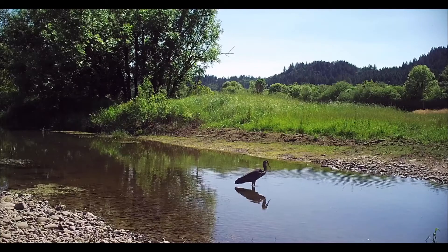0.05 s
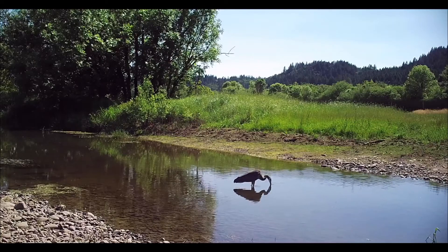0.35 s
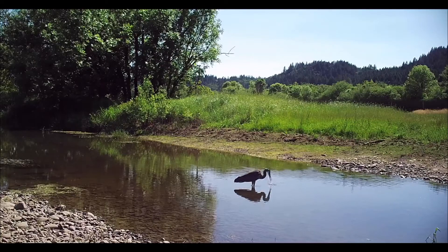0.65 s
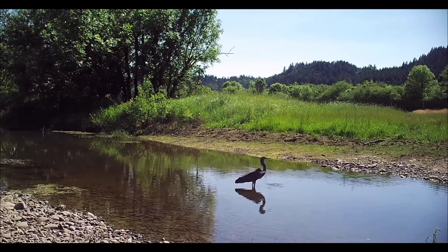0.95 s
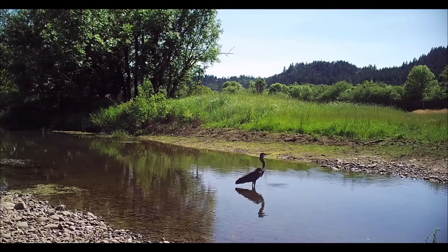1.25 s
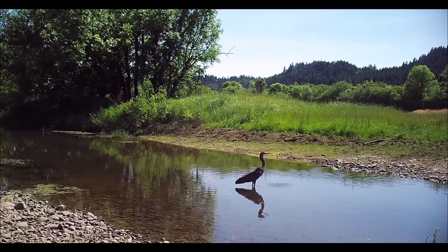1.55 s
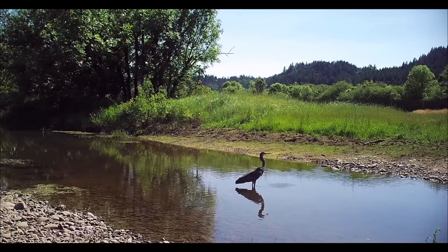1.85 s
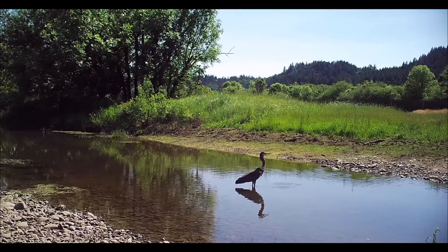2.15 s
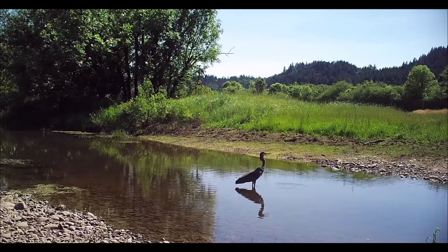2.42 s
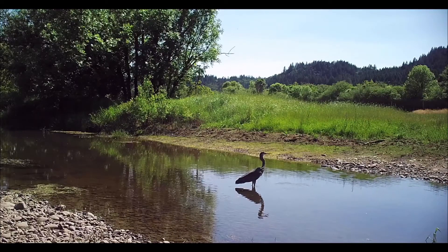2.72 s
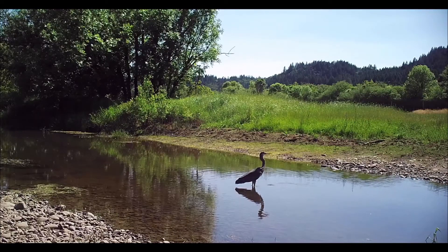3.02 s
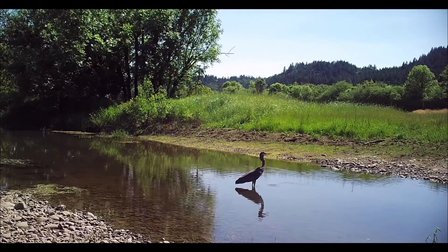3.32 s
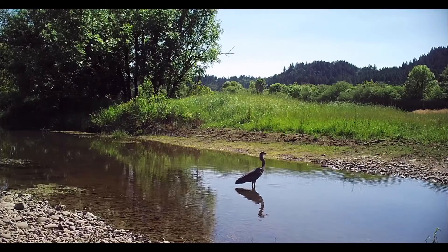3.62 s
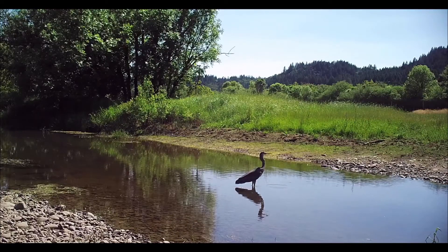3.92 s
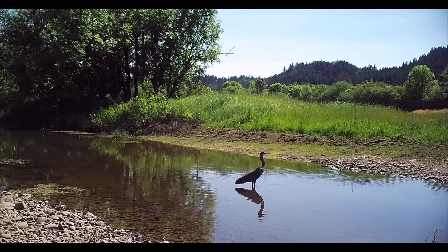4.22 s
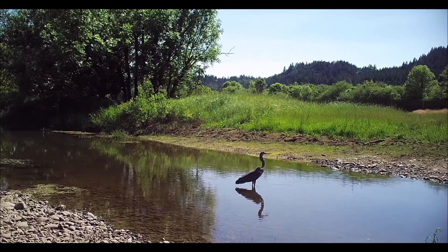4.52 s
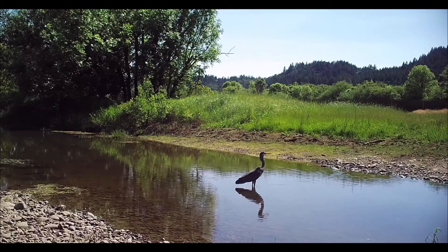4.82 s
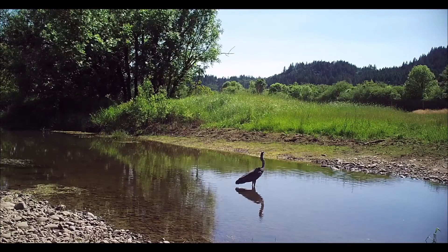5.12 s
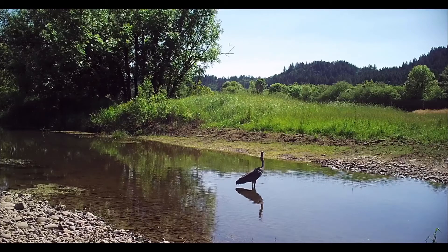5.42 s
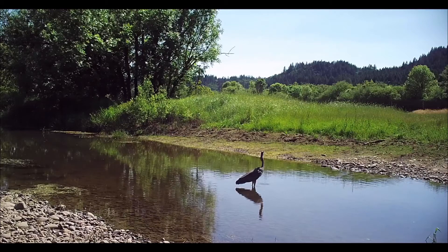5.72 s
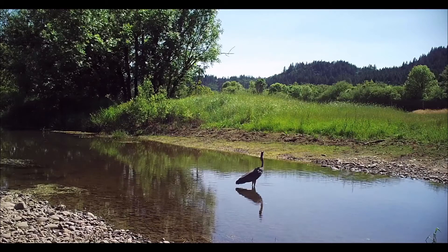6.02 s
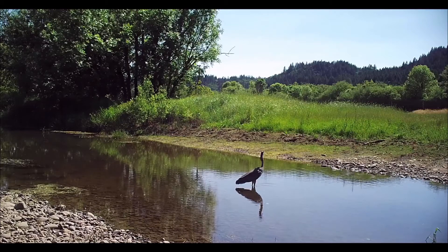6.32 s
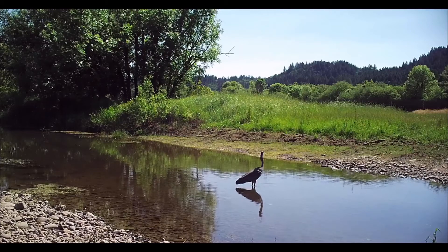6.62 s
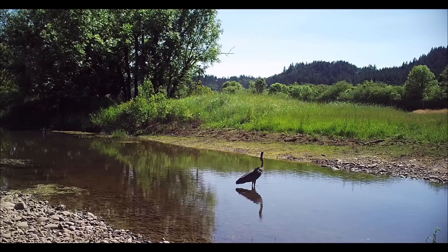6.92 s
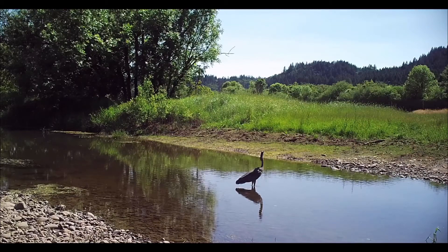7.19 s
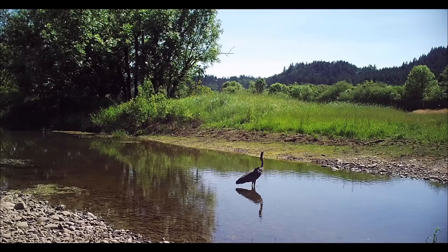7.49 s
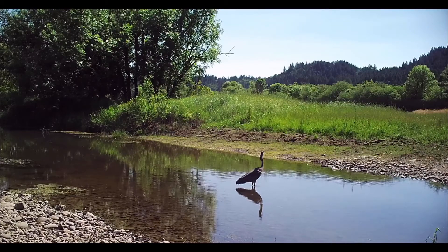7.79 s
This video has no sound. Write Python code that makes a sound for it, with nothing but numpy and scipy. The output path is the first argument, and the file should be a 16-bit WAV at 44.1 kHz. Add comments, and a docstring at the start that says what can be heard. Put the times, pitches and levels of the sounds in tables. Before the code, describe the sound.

A soft wash of water and leaves runs for all eight seconds beside a quiet creek, with a low distant rumble and faint microphone hiss. A far engine drones within the rumble, swelling slightly just before one second, then sinking back. From about 0.5 to 0.7 seconds, a cluster of sharp, ringing ticks sounds on the right, like a tiny splash. Small birds whistle and pip faintly in the distance through the first four and a half seconds. At about 4.6 seconds a blackbird on the right begins with short notes and a quick stutter. Its clear whistle at 4.8 seconds is the loudest sound and ends in a harsh snap. A buzzing, two-voiced trill follows until 5.5 seconds, closing with a short lower note. Banks and trees add a light echo. From 6.5 seconds, a few faint, thin calls return, with one stray click near 7.6 seconds.

```python
"""A blackbird by a quiet creek

Water and leaves make a soft wash over a low, distant rumble with an engine's drone in it.
Small birds chirp far off. A brief cluster of sharp, ringing ticks sounds on the right, with stray clicks.
A blackbird on the right sings once: short notes, a loud whistle, then a buzzing, two-voiced trill.
Banks and trees scatter the calls, and the microphones add a faint hiss."""
import sys
import numpy as np
from scipy import signal
from scipy.fft import rfft, irfft, next_fast_len
from scipy.io import wavfile

SR = 44100
rng = np.random.default_rng(int(sys.argv[2]) if len(sys.argv) > 2 else 0)


def waveform_to_disk(signal):
    """Save audio, clipped to [-1, 1], as 16-bit WAV at the path in sys.argv[1]."""
    frames = np.transpose(np.atleast_2d(signal))
    scaled = np.clip(frames, -1, 1) * 32767
    samples = np.round(scaled).astype(np.int16)
    wavfile.write(sys.argv[1], SR, samples)


N = 350595
TIME = np.arange(N) / SR


def undb(db):
    """Turn decibels (dB) into a number to multiply a sound by."""
    return 10 ** (np.asarray(db) / 20)


def unit(x):
    """Scale a sound so that its average power is 1."""
    return x / np.sqrt(np.mean(x ** 2))


def curves(table):
    """Join rows that begin with a time into one curve for each other column."""
    times, *columns = np.transpose(table)
    return [np.interp(TIME, times, column) for column in columns]


def colour(x, points):
    """Turn a sound's lows and highs up or down. Each point: frequency in Hz, gain in dB."""
    hz, db = np.transpose(points)
    size = next_fast_len(x.shape[-1])
    freqs = np.maximum(np.fft.rfftfreq(size, 1 / SR), 1)
    gain = undb(np.interp(np.log(freqs), np.log(hz), db))
    return irfft(rfft(x, size) * gain, size)[..., :x.shape[-1]]


def wobble(rate, size=N):
    """A random curve, about 1 in size, that changes course `rate` times a second."""
    at = np.arange(size) * rate / SR
    corners = rng.standard_normal(int(at[-1]) + 2)
    return np.interp(at, np.arange(len(corners)), corners) * np.sqrt(3 / 2)


def phase_of(hz):
    """Add up a changing pitch into the angle of its wave."""
    return 2 * np.pi * np.cumsum(hz) / SR


def gate(start, end, edge_s):
    """Fade in around `start` and out around `end`."""
    return np.clip(np.minimum(TIME - start, end - TIME) / edge_s + .5, 0, 1)


def sprinkle(span_s, count):
    """Spread events loosely over a span. Each row: start in seconds, two random numbers from 0 to 1."""
    late, a, b = rng.random((count, 3)).T
    first, last = span_s
    return zip(first + (last - first) * (np.arange(count) + late) / count, a, b)


def add(track, start_s, sound):
    """Mix a sound into a track at the given time."""
    start = max(int(start_s * SR), 0)
    part = sound[:max(N - start, 0)]
    track[start:start + len(part)] += part


def place(x, left_db, lag_ms=0):
    """Make stereo: a sound on the right reaches the left microphone weaker, and later if given a lag."""
    left, right = np.broadcast_to(x, (2, N))
    left = np.roll(left, round(lag_ms * SR / 1000))
    return np.array([left * undb(left_db), right])


def stereo_noise(likeness):
    """Left and right noise: unrelated at likeness 0, the same at 1."""
    shared, side = rng.standard_normal((2, N))
    return np.sqrt(1 + likeness) * shared + np.sqrt(1 - likeness) * np.array([side, -side])


def scatter(x, fade_s, build_s):
    """Give each microphone many small echoes, which fall 60 dB in `fade_s`."""
    t = np.arange(SR) / SR
    build_up = 1 - np.exp(-(t / build_s) ** 2)
    echoes = rng.standard_normal((2, SR)) * np.exp(-np.log(1000) * t / fade_s) * build_up
    echoes /= np.sqrt(np.sum(echoes ** 2, axis=1, keepdims=True))
    return signal.fftconvolve(x[None], echoes, axes=1)[:, :N]


def rumble():
    """Low noise from far away, with the wavering drone of an engine in it."""
    # The rumble's tone. Each row: frequency in Hz, relative level in dB.
    tone = [(15, -16), (25, -11), (40, -9.5), (65, -5), (100, -11), (135, -14), (165, -26), (210, -35),
            (340, -54), (570, -100)]
    # Its slow swells. Each row: time in seconds, level in dB.
    swells = [(0, -38.5), (.9, -36), (1.2, -38), (3.1, -39), (3.25, -35), (3.6, -38), (5.2, -37),
              (7.9, -39)]
    # The engine. Each row: time in seconds, pitch in Hz, level in dB.
    engine = [(0, 84, -40.5), (.45, 84, -39.5), (.85, 92, -33.5), (1.25, 93, -47.5), (7.95, 93, -44)]
    noise_db, = curves(swells)
    drone_hz, drone_db = curves(engine)
    noise = unit(colour(stereo_noise(likeness=.93), tone)) * undb(noise_db)
    drone = np.sqrt(2) * np.sin(phase_of(drone_hz + 4 * wobble(16)))
    drone *= undb(drone_db + 1.7 * wobble(7))
    return place(noise + drone, left_db=-11)


def creek(level_db=-55.5, split_hz=700):
    """A soft wash of water and leaves whose lows and highs stir separately."""
    # The wash's tone. Each row: frequency in Hz, relative level in dB.
    tone = [(120, 2), (230, -1), (400, -0.5), (620, -3), (1000, -4), (1500, -10), (2400, -16), (4500, -18),
            (6900, -16.5), (9000, -23), (15000, -26.5)]
    # How it leans to one side. Each row: frequency in Hz, left level minus right level in dB.
    lean = [(200, 0.5), (400, -2.5), (700, -3), (1200, -6), (2400, 0), (7000, -3)]
    wash = unit(colour(stereo_noise(likeness=.3), tone))
    lows = signal.sosfilt(signal.butter(1, split_hz, fs=SR, output="sos"), wash)
    highs = wash - lows
    left, right = lows * undb(.45 * wobble(8.3)) + highs * undb(.64 * wobble(6))
    return np.array([colour(left, lean), right]) * undb(level_db)


def note(length_s, hz, glide_hz, rasp, octave_db=-30, arch=.0068):
    """A bird's nearly pure note slides in a slight arch; rasp shakes its pitch and level quickly."""
    size = int(length_s * SR)
    progress = np.linspace(0, 1, size)
    pitch = hz * (1 - arch * (2 * progress - 1) ** 2) + glide_hz * (progress - .5)
    phase = phase_of(pitch * (1 + .12 * rasp * wobble(1500, size)))
    swell = np.sin(np.pi * progress) ** .75
    flutter = undb(2.8 * rasp * wobble(253, size))
    return unit(swell * flutter * (np.sin(phase) + undb(octave_db) * np.sin(2 * phase)))


def phrase(rows):
    """Play one bird note for each row."""
    track = np.zeros(N)
    for start, length, hz, glide_hz, db, rasp in rows:
        add(track, start, undb(db) * note(length, hz, glide_hz, rasp))
    return track


def far_birds(slur_rasp=.18, pip_s=.028, pip_glide_hz=40, pip_rasp=.17):
    """Small birds whistle, pip and buzz far off, softened by the trees."""
    # A songbird's sliding whistles. Each row: start and length in seconds, pitch and glide in Hz,
    # level in dB.
    slurs = [(.31, .08, 2500, -200, -70), (1.15, .06, 2150, 700, -72), (1.22, .062, 2880, -100, -70),
             (1.32, .08, 2150, -100, -72), (1.652, .055, 2950, -1200, -70), (1.96, .075, 2340, 700, -69),
             (2.375, 0.044, 2780, -1200, -65.5), (2.46, .053, 2720, 500, -70),
             (2.515, .058, 2750, -300, -67.5), (2.803, .037, 2030, -500, -68), (2.92, .075, 2000, 200, -69),
             (3.212, 0.033, 2570, -500, -65.5), (3.272, 0.027, 3060, 0, -64), (3.499, .13, 2630, 390, -68),
             (3.975, 0.056, 3000, -1050, -66.5), (4.06, .038, 2760, -330, -65),
             (7.885, .03, 3300, -1700, -68)]
    # Low pips, all alike. Each row: start in seconds, pitch in Hz, level in dB.
    pips = [(2.66, 2040, -67), (2.755, 2080, -61.5), (2.848, 2060, -63), (3.005, 2110, -63),
            (3.15, 2100, -65), (3.51, 2010, -64.5), (3.635, 2040, -62.5), (3.76, 1975, -64),
            (4.56, 2060, -61)]
    # Other birds' thin or buzzy calls. Each row: as for the slurs, then rasp from 0 to 1.
    thin_calls = [(0, 0.11, 3120, -70, -66, .64), (.27, .11, 6400, 30, -62.5, 0),
                  (1.06, .59, 4420, -600, -76, .2), (3.4, .025, 6230, 50, -64, .13),
                  (3.76, .032, 5900, 100, -66.5, .05), (6.55, .1, 5050, -180, -71, 1),
                  (6.78, .17, 3420, 60, -66, .53), (7.315, .075, 3490, -260, -59, .15),
                  (7.61, .065, 4220, -200, -67.5, .45), (7.845, 0.055, 4230, -60, -64, 0.27)]
    notes = [(*row, slur_rasp) for row in slurs]
    notes += [(start, pip_s, hz, pip_glide_hz, db, pip_rasp) for start, hz, db in pips]
    # The songbird's softer notes fall at random among its whistles.
    notes += [(start, .06, 1950 + 400 * high, 400 * (2 * rise - 1), -71, slur_rasp)
              for start, high, rise in sprinkle(span_s=(1.1, 4.4), count=5)]
    calls = phrase(notes) + phrase(thin_calls)
    echoes = scatter(calls, fade_s=.32, build_s=.0045)
    return place(calls, left_db=-9) + undb(-4.5) * place(echoes, left_db=-13)


def ticks(ring_s=.00056, fizz_s=.0058):
    """Sharp ticks on the right: each is a click with a tiny ring and a short fizz of noise."""
    # A brief cluster and a few strays. Each row: start in seconds, relative level in dB,
    # ring pitch in Hz, extra ring level in dB.
    main_ticks = [(.096, -52, 5500, -1), (.5012, -47, 4600, 5), (.505, -47, 7100, 0), (.508, -52, 3500, 9),
                  (.5697, -44, 3200, 2), (.573, -39, 7700, 0), (.59, -51, 2380, 8), (.5955, -49, 3500, 4),
                  (.5985, -46.5, 3530, 7), (.6038, -40, 6900, 1), (.6215, -31.5, 7100, 5),
                  (.622, -40, 5240, 3), (.6268, -41, 7260, 6), (.6348, -31, 7000, 3.5),
                  (.6445, -43, 6800, -10), (.6965, -42, 7000, 1), (7.635, -50.5, 7200, 4)]
    # The tone of a click. Each row: frequency in Hz, gain in dB.
    click_tone = [(800, -31), (2000, -12), (3400, -11.5), (4000, -15), (4700, -9), (6000, -9), (6950, 0),
                  (7800, -7), (8400, -5), (9300, -17), (15000, -33)]
    # Fainter ticks come at random around the cluster.
    faint_ticks = [(start, -57 + 4 * strength, np.interp(high, [0, 1], [2600, 7500]), 5)
                   for start, strength, high in sprinkle(span_s=(.47, .7), count=7)]
    clicks, rings = np.zeros((2, N))
    t = np.arange(SR // 20) / SR
    spike = undb(22.5) * (t == 0)
    for start, db, hz, ring_db in list(main_ticks) + faint_ticks:
        fizz = undb(-1) * np.exp(-t / fizz_s) * rng.standard_normal(len(t))
        add(clicks, start, undb(db) * (spike + fizz))
        # The ring builds over a few cycles as it dies away.
        swell = (1 - np.exp(-t * hz / 2)) * np.exp(-t / ring_s)
        add(rings, start, undb(db + ring_db + 11.5) * swell * np.sin(2 * np.pi * hz * t))
    ticking = colour(clicks, click_tone) + rings
    echoes = scatter(ticking, fade_s=.2, build_s=.0032)
    return place(ticking, left_db=-10.5) + undb(-13) * place(echoes, left_db=-8)


def blackbird(echo_s=.08, echo_db=-25):
    """One song from a perch on the right; the far bank throws it back."""
    # Short notes, squeaks and faint lingering tones. Each row: start and length in seconds,
    # pitch and glide in Hz, level in dB, rasp from 0 to 1.
    short_notes = [(4.555, 0.055, 1550, 0, -62.5, .04), (4.63, 0.045, 1730, 100, -56, 0.4),
                   (4.65, 0.042, 7100, 290, -59, 0.15), (4.6645, 0.0065, 7120, 130, -46.5, .05),
                   (4.858, 0.03, 5870, 80, -49, .14), (4.868, 0.023, 6930, 100, -50, .12),
                   (4.93, 0.1, 5640, 20, -65, 0.02), (5.485, .08, 7300, 100, -62, .06),
                   (5.545, 0.072, 1863, -30, -53, 0.03), (5.6, .11, 1858, 10, -63, 0.07)]
    song = phrase(short_notes) + stutter() + whistle() + trill()
    bank_echo = undb(echo_db) * np.roll(song, int(echo_s * SR))
    echoes = scatter(song, fade_s=.32, build_s=.024)
    return place(song + bank_echo, left_db=-12.5, lag_ms=.15) + undb(-9.5) * place(echoes, left_db=-12.5)


def stutter(start_s=4.668, gap_s=.0195, hz=2880, db=-49):
    """Five quick falling pulses lead into the whistle, each trailing off in a short rasp."""
    starts = start_s + gap_s * np.arange(5)
    pulses = phrase([(start, .0048, hz, -380, db, .35) for start in starts])
    rasps = phrase([(start, .02, hz, 300, db - 10, .54) for start in starts])
    return pulses + rasps


def whistle(snap_at_s=4.902, snap_fade_s=.0038, harsh_width_s=.025):
    """A loud, clean tone jumps an octave (to twice its pitch), turns harsh and snaps off."""
    # The whistle's path. Each row: time in seconds, pitch in Hz, level in dB, octave's level in dB.
    path = [(4.748, 2886, -54, -75), (4.777, 2775, -38, -64), (4.795, 2762, -30, -60),
            (4.814, 2732, -42.5, -62), (4.849, 2736, -50, -55), (4.859, 2750, -58, -35.5),
            (4.878, 2778, -57, -45.5), (4.9, 2705, -62, -62)]
    # The tone of the harsh ending. Each row: frequency in Hz, relative level in dB.
    snap_tone = [(3500, -38), (4900, -13), (5600, 4), (6900, -3), (8200, -7), (9500, -30)]
    hz, db, octave_db = curves(path)
    phase = phase_of(hz * (1 + .002 * wobble(600)))
    tone = np.sqrt(2) * (undb(db) * np.sin(phase) + undb(octave_db) * np.sin(2 * phase))
    tone *= gate(path[0][0], path[-1][0], edge_s=.004)
    since = TIME - snap_at_s
    harsh = undb(-50) * np.exp(-np.abs(since) / harsh_width_s)
    snap = undb(-36) * np.exp(-np.abs(since) / snap_fade_s) * (since > 0)
    return tone + (harsh + snap) * unit(colour(rng.standard_normal(N), snap_tone))


def trill_curves(edge_s=.022, arch_hz_per_s=135, sag_db_per_s=8.5):
    """Each syllable of the trill arches up in pitch, sags in level, then slides into the next."""
    # Each row: start and length in seconds, upper and lower pitch in Hz, level in dB,
    # lower voice's level against the upper in dB, buzz strength in dB.
    syllables = [(4.926, .061, 3752, 3164, -43, -6, -4.5), (5.011, .049, 3770, 3140, -46.5, -1, -5),
                 (5.056, .367, 3890, 3227, -48, 0.5, 2.5), (5.43, 0.034, 3790, 3125, -49, 3.5, 2)]
    points, singing = [], 0
    for start, length, upper_hz, lower_hz, db, lower_db, buzz_db in syllables:
        singing += gate(start, start + length, edge_s)
        for progress in np.linspace(0, 1, 9):
            arch = length * np.sin(np.pi * progress)  # longer syllables bend further
            rise = 1 + arch_hz_per_s * arch / upper_hz
            at = start + edge_s / 2 + progress * (length - edge_s)
            points.append((at, upper_hz * rise, lower_hz * rise, db - sag_db_per_s * arch,
                           lower_db, buzz_db))
    return *curves(points), singing


def trill():
    """Both sides of the bird's voice box sound at once and shake each other into a buzz."""
    # The buzz's side tones, in steps from the upper voice; a step is half the gap between the voices.
    side_steps = [-3, -1, 1, 2, 3, 5, 6, 7, 8]
    # The relative level of each side tone in dB.
    side_levels = [-14, -8, -18.5, -21.5, -23.5, -26, -30, -29, -26]
    upper_hz, lower_hz, db, lower_db, buzz_db, singing = trill_curves()
    buzz = undb(buzz_db)
    waver = 1 + .003 * buzz * wobble(300)
    upper = phase_of(upper_hz * waver)
    lower = phase_of(lower_hz * waver + 12 * buzz * wobble(200))
    buzz_phase = (upper - lower) / 2
    # The upper voice is twice the pitch of a weak base tone, which also sounds at 3 and 4 times.
    voice = np.sin(upper) + undb(-20) * buzz * np.sin(upper / 2)
    voice += (undb(-30) * np.sin(1.5 * upper) + undb(-37) * np.sin(2 * upper)) / buzz ** 2
    voice += undb(lower_db + 2 * wobble(70)) * np.sin(lower)
    for step, side_db in zip(side_steps, side_levels):
        voice += buzz * undb(side_db + 3.5 * wobble(70)) * np.sin(upper + step * buzz_phase)
    # Rushing air escapes once in each cycle of the buzz.
    air_tone = [(1800, -24), (2900, -1), (3800, -7), (4800, -14), (7000, -11), (10000, -22)]
    air = unit(colour(rng.standard_normal(N), air_tone))
    voice += undb(-17.5) * buzz * air * (1 + np.cos(buzz_phase))
    return np.sqrt(2) * voice * undb(db + 1.1 * wobble(55)) * singing


def scene():
    """Everything that reaches the two microphones."""
    return blackbird() + far_birds() + ticks() + rumble() + creek()


def record(dry, top_hz=15200):
    """The microphones add hiss, lose the highest treble and shift the wave slightly off zero."""
    # The hiss's tone. Each row: frequency in Hz, relative level in dB.
    hiss_tone = [(20, 26.5), (80, 18), (200, 1), (5000, -0.5), (9000, 3), (15000, 2.5)]
    # The steady shift, left then right, where 1 is full scale.
    offset = [-.0349, -.0377]
    hiss = undb(-61.5) * unit(colour(stereo_noise(likeness=.27), hiss_tone))
    treble_cut = signal.ellip(10, .1, 70, top_hz, fs=SR, output="sos")
    return signal.sosfilt(treble_cut, dry + hiss) + np.array(offset)[:, None]


dry = scene()
out = record(dry)
waveform_to_disk(out)
```